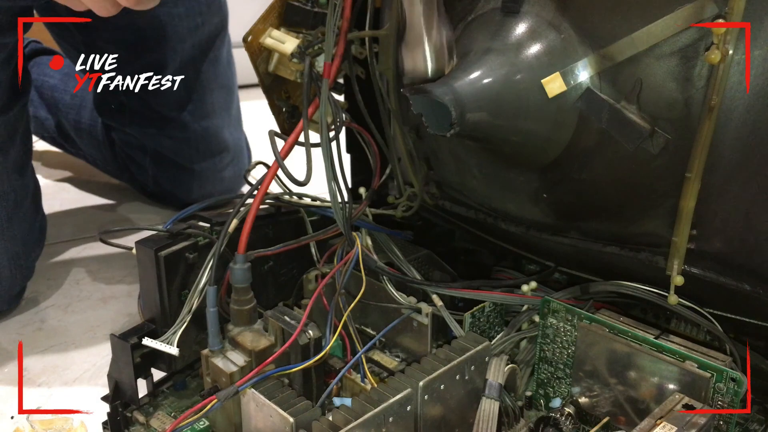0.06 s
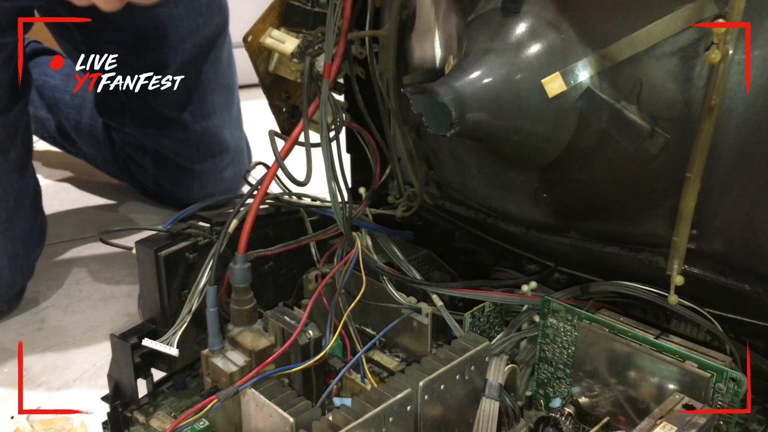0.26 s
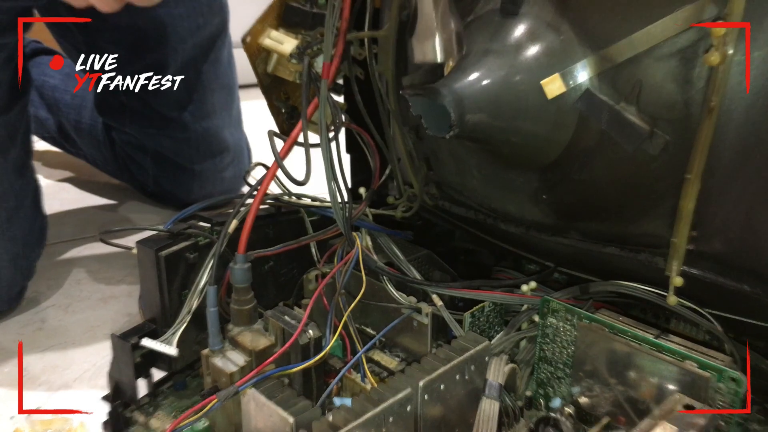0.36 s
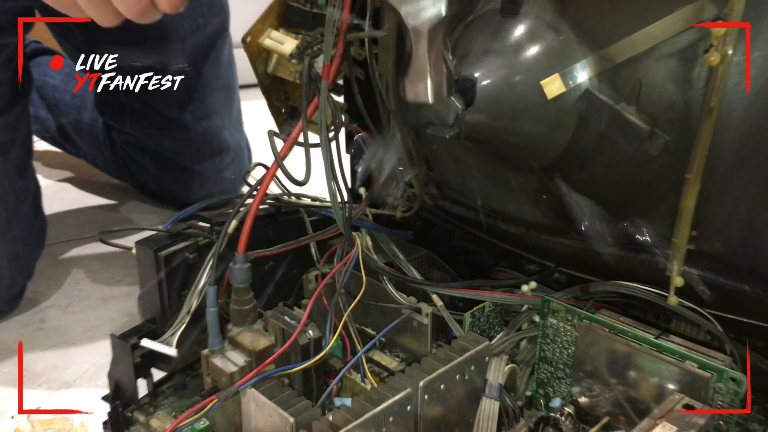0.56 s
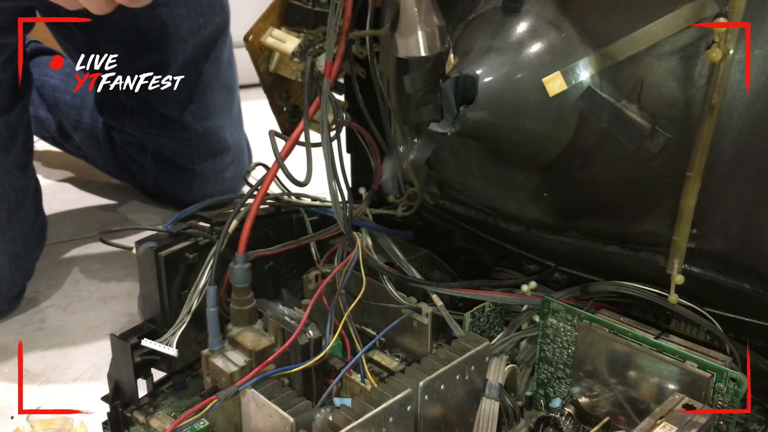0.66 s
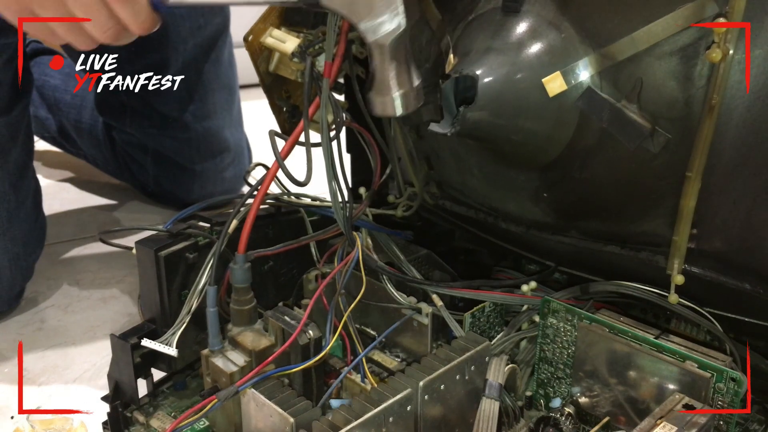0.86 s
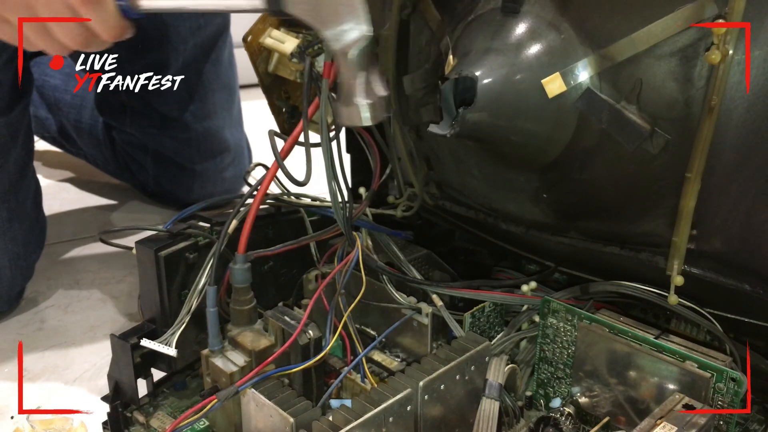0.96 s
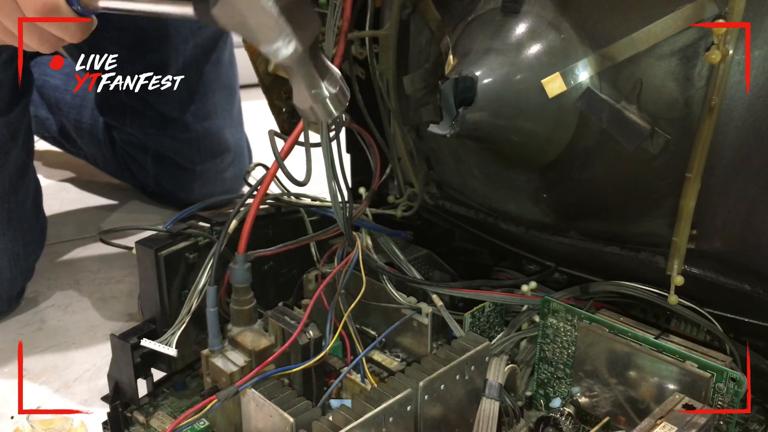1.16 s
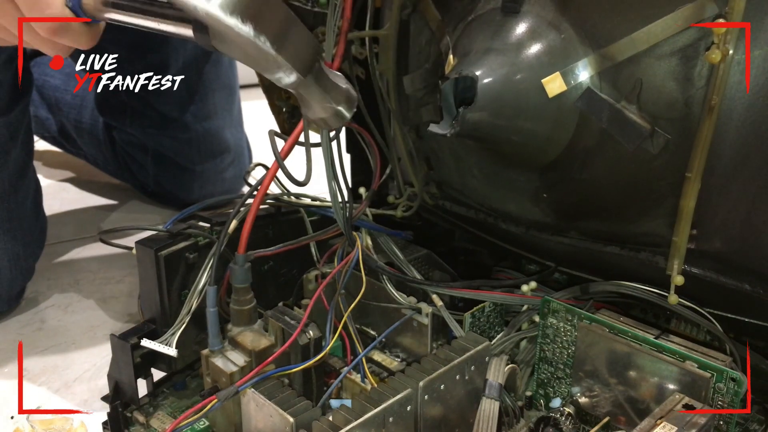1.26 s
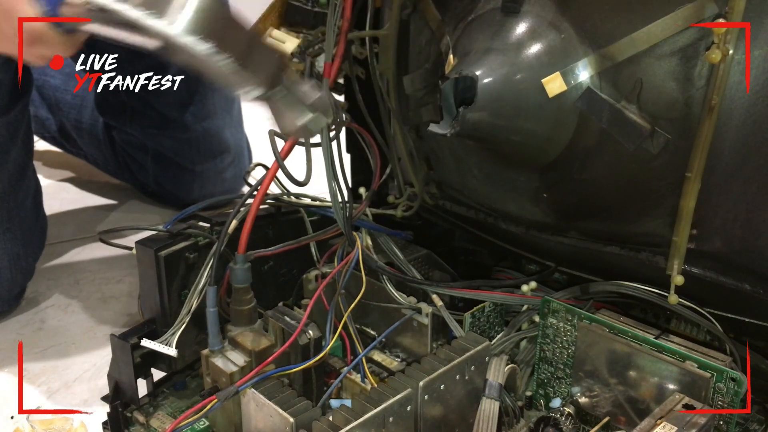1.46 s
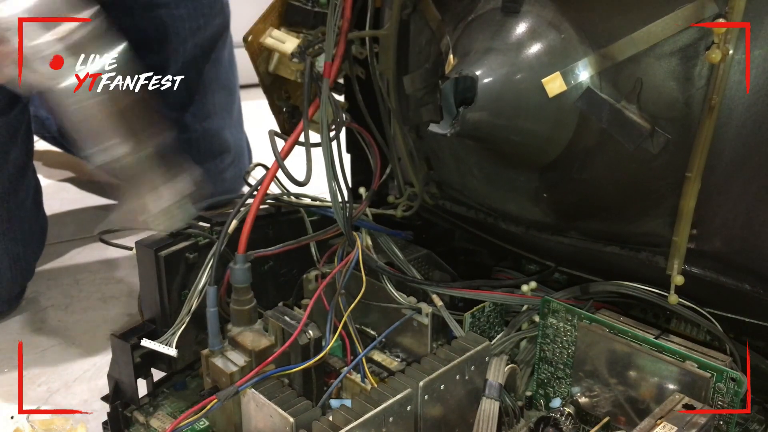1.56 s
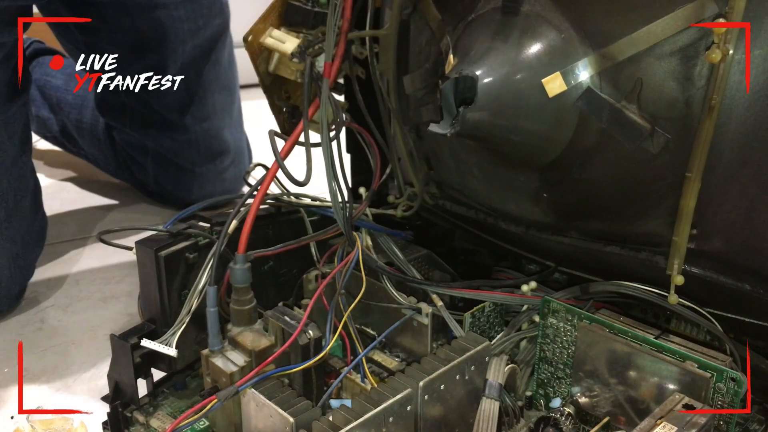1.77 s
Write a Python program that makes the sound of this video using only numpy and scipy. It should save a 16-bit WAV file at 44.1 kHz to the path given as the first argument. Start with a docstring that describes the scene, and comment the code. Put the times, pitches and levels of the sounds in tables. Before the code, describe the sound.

A steel hammer knocks twice on a television's glass picture tube and snaps its neck with a third blow. Pieces clink onto circuit boards with a trickle of splinters, heard close up in a quiet, fairly live room.

```python
"""A faint tick of glass, then a steel hammer knocks twice on the neck of a picture tube and snaps it
off with a third blow. The glass funnel rings and the cabinet booms under the blows; then pieces
clink down onto the circuit boards in a trickle of splinters. One microphone stands near the set,
in a quiet, fairly live room."""
import sys
import numpy as np
from scipy import signal
from scipy.fft import rfft, irfft
from scipy.io import wavfile

SR = 44100
rng = np.random.default_rng(int(sys.argv[2]) if len(sys.argv) > 2 else 0)


def to_wav(s):
    """Save 16-bit WAV."""
    ch = np.atleast_2d(s).T  # columns
    pcm = np.round(np.clip(ch, -1, 1) * 32767)  # PCM
    wavfile.write(sys.argv[1], SR, pcm.astype(np.int16))


N = 79380
T = np.arange(SR) / SR  # one second, the span of a single strike

# hammer blows: t/s, crack/dB, contact/dB, funnel/dB, funnel tilt/(dB per octave), funnel rise/s,
# funnel t60 factor, bright modes/dB, cabinet/dB
BLOWS = [(0.1985, 0.5, -9, -3.5, -12.5, 0.0042, 0.47, -8.5, -4),
         (0.3986, 2.5, 1.5, 2, 1, 0.0033, 0.87, -1.5, -1),
         (.605, -5.5, -7, 7, 4.5, 0.0099, 0.8, -3.5, -22.5)]
# bands of the sharp crack as steel meets glass: f/Hz, level/dB, t60/s
CRACK_BANDS = [(117, -11, .05), (260, 4, 0.032), (556, -14, 0.11), (1180, 2.5, 0.013), (1700, -8, 0.017),
               (4160, -2.5, 0.012), (8500, -10, 0.015), (11500, -15.5, 0.022), (16150, -23.5, .02)]
# bands of the dense, quickly dying vibration of each contact: f/Hz, level/dB, t60/s
CONTACT_BANDS = [(63.6, -23, 0.302), (240, -3.5, 0.15), (400, -24.5, 0.51), (680, -3, 0.17),
                 (907, -18.5, 0.11), (1280, -1, .13), (1750, -26.5, 0.178), (2113, -10, 0.2),
                 (2900, -24, 0.14), (4200, -8, 0.064), (8940, -18.5, 0.13), (10500, -20, 0.087),
                 (16000, -28, .09)]
# bright modes of the neck and hammer head: f/Hz, level/dB, t60/s
BRIGHT_MODES = [(3386, -35, .18), (4196, -27, .15), (4615, -33, .22), (4870, -32, .15), (5410, -18, .13),
                (5461, -27, .16), (5926, -34, .16), (6173, -26, .11), (6900, -28, .13), (7597, -35, .14),
                (8290, -19, .1), (8594, -22, .07)]
# modes of the glass funnel, before each blow scales them: f/Hz, level/dB, t60/s
FUNNEL_MODES = [(775, -25, .3), (1100, -16.5, .22), (1167, -17, .15), (1206, -23, .18), (1254, -16, .3),
                (1286, -22, .3), (1525, -23, .27), (1558, -21, .29), (2160, -31, .24), (2196, -33, .26),
                (2232, -34, .38), (2589, -33, .3)]
# bands of the run of cracks as the neck snaps: f/Hz, level/dB, t60/s
FRACTURE_BANDS = [(300, -22.5, .15), (820, -46, 0.17), (1250, -7.5, 0.53), (1833, -14, 0.241),
                  (2040, -0.5, 0.19), (2780, -16, 0.16), (4200, -2.5, 0.21), (6300, -2, 0.15),
                  (8400, -19, 0.26), (11700, -8.5, 0.15), (16550, -30, 0.18)]
# modes of the severed neck: f/Hz, level/dB, t60/s
NECK_MODES = [(2200, -30.5, 0.59), (4530, -22.5, 0.22), (6100, -32, 0.194), (10915, -30.5, 0.25)]
# modes of the cabinet: f/Hz, level/dB, t60/s
CABINET_MODES = [(99.6, -38, 0.91), (114.5, -34.5, 1), (176, -29.5, 0.403), (216, -24.5, 0.086),
                 (250, -17.5, .16), (293.8, -23, 0.35), (475.3, -35.5, 0.45), (628, -27.5, 0.4)]
# low thumps as the set rocks: t/s, f/Hz, level/dB, rise/s, t60/s
THUMPS = [(0.224, 55.4, -28, 0.0067, 0.13), (0.279, 111.7, -36, 0.01, 0.64),
          (0.424, 65, -33.5, 0.004, 0.16), (0.476, 88, -24, 0.0045, 0.088), (.5, 109.3, -37, 0.008, 0.43),
          (.609, 58.8, -16.5, 0.011, .1), (0.798, 108, -40, 0.035, 0.52), (0.801, 278.7, -39, 0.0058, 0.24),
          (1.1, 251.2, -46, 0.009, 0.42), (1.101, 97.2, -46.5, 0.028, 0.63)]
# falling pieces: t/s, board knock/dB, middle/dB, treble/dB, t60/s, ring f/Hz, ring level/dB, ring t60/s
PIECES = [(0.086, -57, -47, -36, 0.03, 9400, -55, 0.12), (0.71, -50, -44, -22, 0.03, 12500, -30, 0.033),
          (0.7567, -51, -57, -24, 0.069, 9520, -34, 0.077), (0.777, -25, -19, -14, 0.043, 6500, -18, 0.02),
          (.8342, -23, -16, -9, .035, 10912, -24, .27), (.8895, -30, -17, -15, .05, 2356, -24, .09),
          (.9218, -1, -4, -14, .036, 1810, -21, .07), (.964, -18, -30, -24.5, 0.097, 1830, -33, 0.093),
          (1.031, -15.5, -19.5, -23.5, 0.12, 15400, -38, 0.15),
          (1.046, -24.5, -46, -52, 0.15, 2300, -17, 0.027),
          (1.1124, -39, -20, -32.5, 0.1, 3430, -21.5, 0.05),
          (1.117, -23.5, -21.5, -21, 0.033, 3087, -18.5, 0.027),
          (1.141, -24.5, -27.5, -53, 0.11, 1407, -30, 0.033),
          (1.2388, -66, -33, -48, 0.032, 3940, -47, .04), (1.28, -41, -33, -54, 0.049, 2390, -63, 0.048),
          (1.359, -62, -40, -45, 0.053, 2630, -45.5, 0.06),
          (1.5165, -43.5, -48.5, -52, 0.22, 1682, -56, .12),
          (1.649, -48, -44.5, -39, 0.29, 4470, -56, 0.38)]
# colour of a piece landing on the boards, in three ranges: f/Hz, level/dB
BOARD_COLOUR = [(120, -40.5), (260, -30), (450, -8), (1100, 3.5), (1900, -3.5), (3000, -39), (6000, -52)]
MIDDLE_COLOUR = [(1200, -42.5), (2300, 4.5), (3000, -0.5), (4400, -0.5), (6500, -10.5), (10000, -32.5)]
TREBLE_COLOUR = [(3500, -22), (6200, -5), (9000, -5.5), (12000, -9.5), (16000, -18.5)]
# course of the trickle of splinters: t/s, level/dB
TRICKLE_LEVEL = [(.62, -40), (.72, -75), (.81, -36.5), (.9, -35.5), (.97, -53), (1.08, -43.5), (1.2, -56),
                 (1.35, -55.5), (1.55, -67), (1.8, -78.5)]
# bands of the room's tail: f/Hz, energy against the sound fed in/dB, t60/s
ROOM_BANDS = [(100, -20.5, 1), (393.6, -8, 1), (1330, -6, 0.65), (2400, -6.5, 0.98), (4250, -11, .9),
              (7770, -13, 1), (16000, -13, 0.61)]
# colour of the room tone: f/Hz, relative level/dB
ROOM_TONE_COLOUR = [(25, -25), (60, 1.5), (110, 1), (190, -6.5), (280, -3), (450, -15), (900, -16.5),
                    (2000, -20.5), (4500, -20), (9500, -23.5), (16000, -32)]

CONTACT_RISE_S, BREAK_S = 0.0024, 0.605


def hammer():
    """Steel meets glass: each blow gives a sharp crack and a dense, short vibration."""
    out = np.zeros(N)
    for s, crack_db, contact_db, *_ in BLOWS:
        crack = amp(crack_db) * die_away(rng.standard_normal(SR), CRACK_BANDS)
        contact = amp(contact_db) * die_away(rng.standard_normal(SR), CONTACT_BANDS)
        add(out, s, rise(CONTACT_RISE_S) * (crack + contact))
    return out


def tube_ring(funnel_delay_s=0.001003):
    """Neck and hammer head ring brightly under each blow; the funnel follows just after."""
    out = np.zeros(N)
    for s, _, _, funnel_db, tilt_db, rise_s, t60_factor, bright_db, _ in BLOWS:
        add(out, s, amp(bright_db) * rise(CONTACT_RISE_S) * ring(BRIGHT_MODES))
        modes = [(hz, db, t60 * t60_factor) for hz, db, t60 in FUNNEL_MODES]
        add(out, s + funnel_delay_s, amp(funnel_db) * rise(rise_s) * ring(modes, tilt_db))
    return out


def neck_snap(cracks_db=-4):
    """Cracks race through the neck and it rings as it comes free; gives (cracks, ringing)."""
    cracks, ringing = np.zeros((2, N))
    run = unit_rms(clicks(per_s=7200, spread_db=2, size=SR))
    add(cracks, BREAK_S, amp(cracks_db) * die_away(run, FRACTURE_BANDS))
    add(ringing, BREAK_S, rise(CONTACT_RISE_S) * ring(NECK_MODES))
    return cracks, ringing


def cabinet(delay_s=0.002915, boom_rise_s=0.0045):
    """The set rocks with low thumps and its cabinet booms under the blows; gives (thumps, boom)."""
    thumps, boom = np.zeros((2, N))
    for s, hz, db, rise_s, t60 in THUMPS:
        add(thumps, s, rise(rise_s) * ring([(hz, db, t60)]))
    for s, *_, cabinet_db in BLOWS:
        add(boom, s + delay_s, amp(cabinet_db) * rise(boom_rise_s) * ring(CABINET_MODES))
    return thumps, boom


def falling_pieces(rise_s=0.0015):
    """Each piece chatters on the boards and rings at its own pitch; gives (landings, ringing)."""
    landings, ringing = np.zeros((2, N))
    for s, board_db, middle_db, treble_db, t60, ring_hz, ring_db, ring_t60 in PIECES:
        grains = clicks(per_s=5300, spread_db=1, size=SR)
        chatter = unit_rms(colour(grains, shard_colour()))
        ranges = [(board_db, BOARD_COLOUR), (middle_db, MIDDLE_COLOUR), (treble_db, TREBLE_COLOUR)]
        contact = sum(amp(db) * colour(chatter, curve) for db, curve in ranges)
        add(landings, s, rise(rise_s) * contact * amp(-60 * T / t60))
        add(ringing, s, rise(rise_s) * ring([(ring_hz, ring_db, ring_t60)]))
    return landings, ringing


def shard_colour(spacing_hz=380, ripple_db=7, lowest_hz=2000):
    """The uneven resonances of one irregular piece, above its lowest mode: f/Hz, level/dB."""
    hz = np.arange(spacing_hz, SR / 2, spacing_hz)
    db = ripple_db * rng.uniform(-1, 1, len(hz)) * (hz > lowest_hz)
    return np.column_stack([hz, db])


def splinters(per_s=450, t60=0.017, band_hz=(1980, 10700), kinds=24, tick_samples=2000):
    """Tiny splinters tick and rustle down after the break."""
    ticks = np.zeros(N)
    fade = amp(-60 * T[:tick_samples] / t60)
    for _ in range(kinds):
        tick = rng.standard_normal(tick_samples) * fade
        ticks += signal.oaconvolve(clicks(per_s / kinds, spread_db=3.5, size=N), tick)[:N]
    rustle = signal.lfilter(*signal.butter(1, band_hz, "band", fs=SR), ticks)
    now = np.arange(N) / SR
    level_db = np.interp(now, *np.transpose(TRICKLE_LEVEL))
    return unit_rms(rustle) * amp(level_db) * (now > BREAK_S)


def room(x, delay_s=0.0028):
    """The room's diffuse tail, reaching the microphone just after the direct sound."""
    # divide out the energy that each band gathers over its decay
    bands = [(hz, db + 10 * np.log10(2 * np.log(1000) / (t60 * SR)), t60) for hz, db, t60 in ROOM_BANDS]
    tail = die_away(rng.standard_normal(SR), bands) * (T > delay_s)
    return signal.fftconvolve(x, tail)[:N]


def room_tone(level_db=-55.5):
    """The quiet, steady background of the room."""
    return amp(level_db) * unit_rms(colour(rng.standard_normal(N), ROOM_TONE_COLOUR))


def amp(db):
    """Decibels to gain."""
    return 10 ** (np.asarray(db) / 20)


def unit_rms(x):
    """Scales to an rms of one."""
    return x / np.sqrt(np.mean(x ** 2) + 1e-20)


def add(mix, s, sound):
    """Mixes a sound in at s seconds."""
    part = mix[max(round(s * SR), 0):][:len(sound)]
    part += sound[:len(part)]


def spread(hz, values, size):
    """Spreads a few values over the log-frequency axis of a spectrum."""
    return np.interp(np.log(np.fft.rfftfreq(size, 1 / SR) + 1), np.log(hz), values)


def colour(x, curve):
    """Filters by a curve of f/Hz, level/dB."""
    return irfft(rfft(x) * amp(spread(*np.transpose(curve), size=len(x))), len(x))


def die_away(x, bands):
    """Gives each band of x its own level and decay."""
    hz, levels_db, t60s = np.transpose(bands)
    spectrum = rfft(x)
    parts = [irfft(spectrum * spread(hz, pick, size=SR), SR) for pick in np.eye(len(hz))]
    return sum(part * amp(db - 60 * T / t60) for part, db, t60 in zip(parts, levels_db, t60s))


def rise(seconds):
    """A straight attack."""
    return np.minimum(T / seconds, 1)


def ring(modes, tilt_db=0):
    """Dying sines, tilted by tilt_db per octave about the middle mode."""
    centre_hz = np.median([row[0] for row in modes])
    out = np.zeros(SR)
    for hz, db, t60 in modes:
        envelope = amp(db + tilt_db * np.log2(hz / centre_hz) - 60 * T / t60)
        out += envelope * np.sin(2 * np.pi * (hz * T + rng.random()))
    return out


def clicks(per_s, spread_db, size):
    """Random clicks of uneven strength."""
    strength = amp(spread_db * np.minimum(rng.exponential(1, size), 4))
    return strength * rng.choice([-1, 1], size) * (rng.random(size) < per_s / SR)


def scene(ring_send_db=-9.5):
    """Blows, break and falling glass at the microphone, with the room behind them."""
    cracks, neck_ring = neck_snap()
    thumps, boom = cabinet()
    landings, piece_ring = falling_pieces()
    hits = hammer() + cracks + thumps + landings + splinters()
    ringing = tube_ring() + neck_ring + boom + piece_ring
    tail = room(hits + amp(ring_send_db) * ringing)
    return (hits + ringing + tail + room_tone())[None]


def record(dry):
    """The microphone channel rounds off the loudest peaks and cuts the very top of the treble."""
    edge_hz = 16300
    lowpass = signal.firwin(301, edge_hz, window=("kaiser", 9), fs=SR)
    return signal.oaconvolve(np.tanh(dry), lowpass[None], "same")


dry = scene()
out = record(dry)
to_wav(out)
```